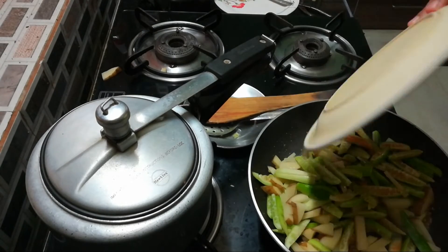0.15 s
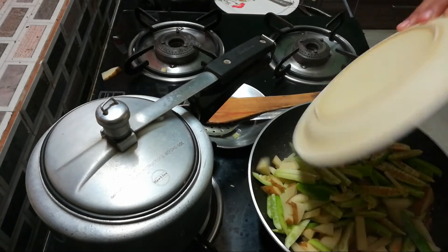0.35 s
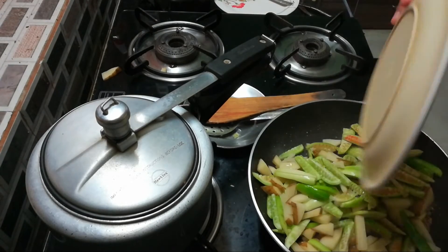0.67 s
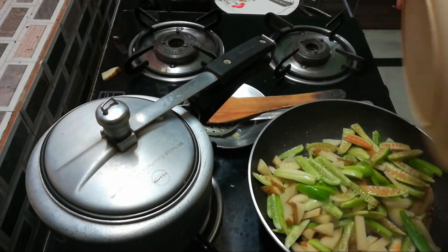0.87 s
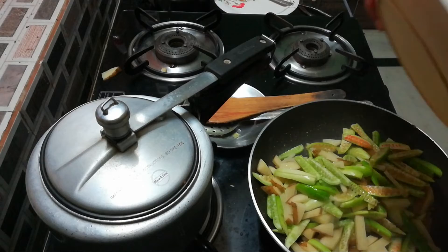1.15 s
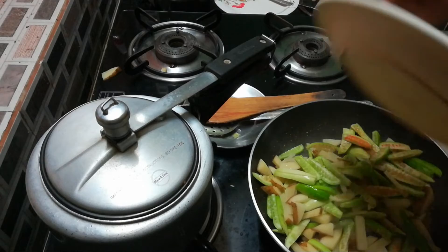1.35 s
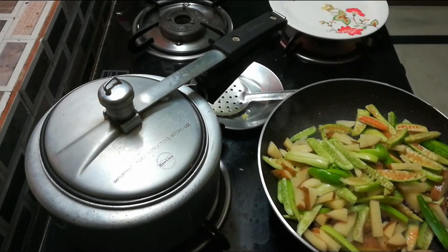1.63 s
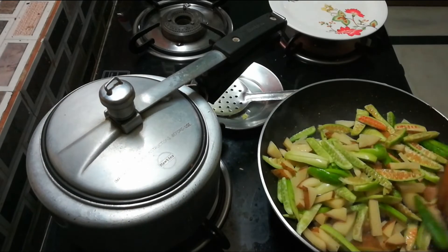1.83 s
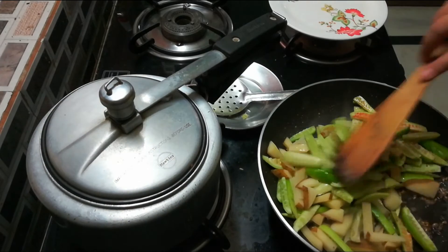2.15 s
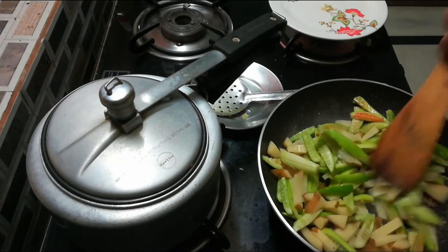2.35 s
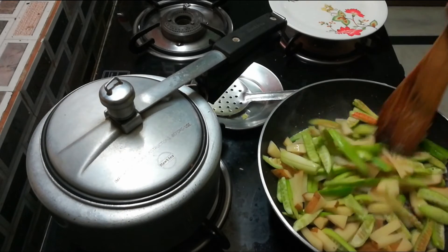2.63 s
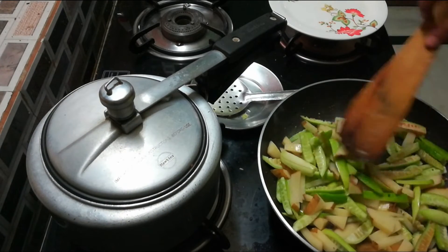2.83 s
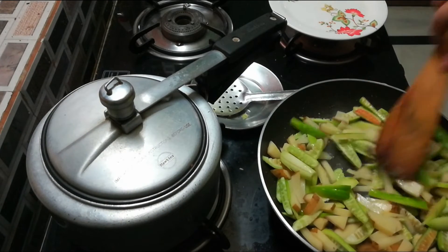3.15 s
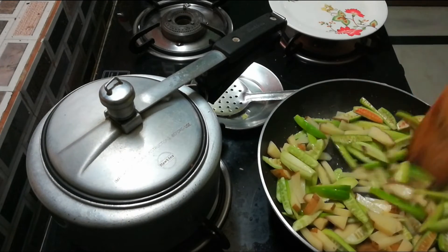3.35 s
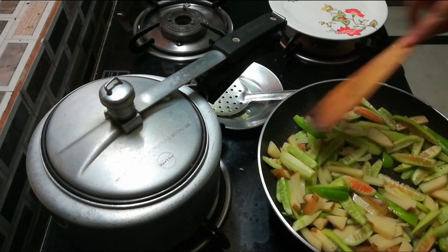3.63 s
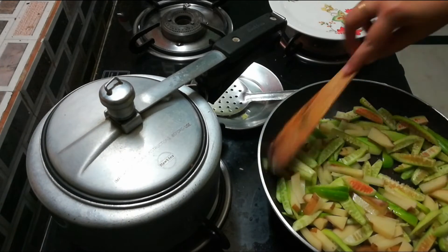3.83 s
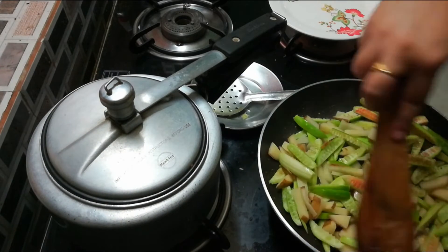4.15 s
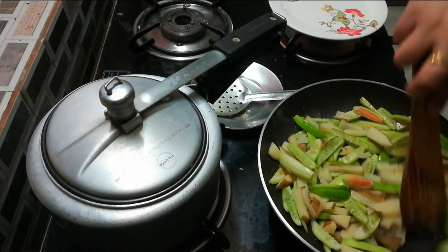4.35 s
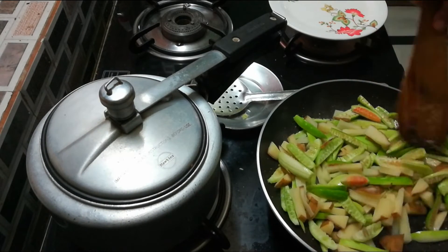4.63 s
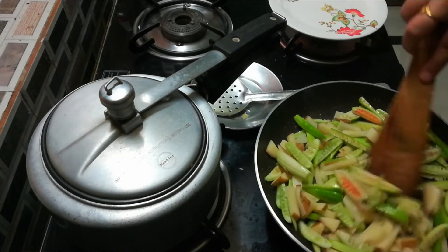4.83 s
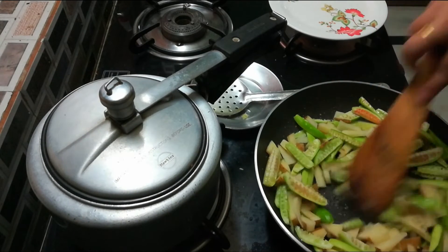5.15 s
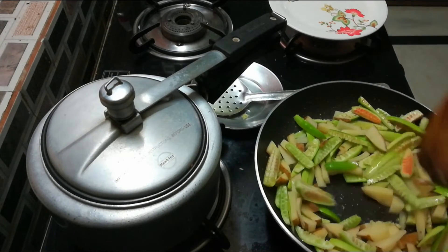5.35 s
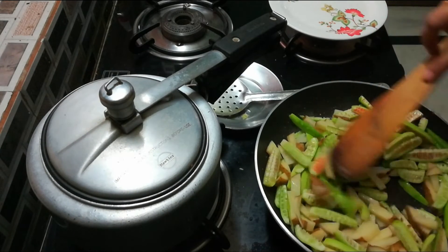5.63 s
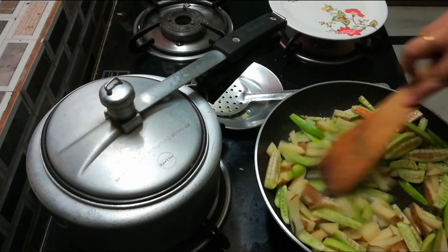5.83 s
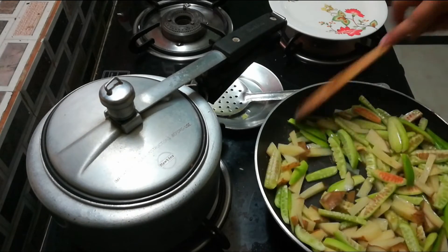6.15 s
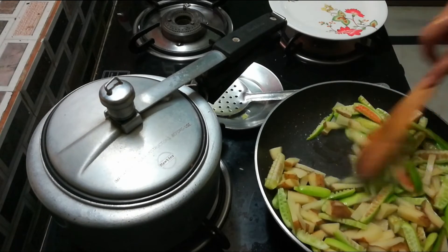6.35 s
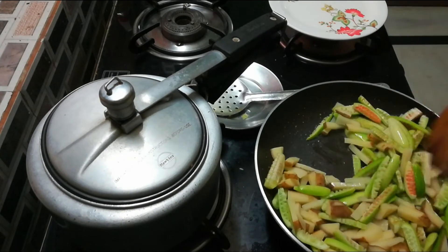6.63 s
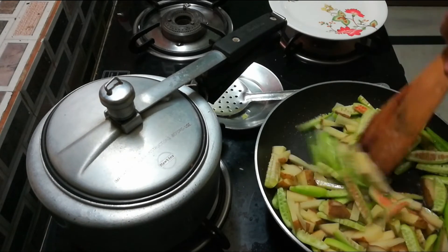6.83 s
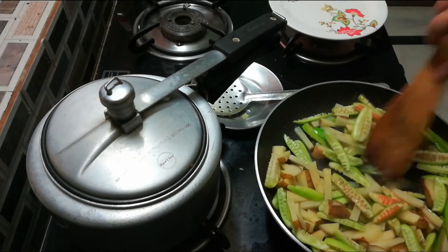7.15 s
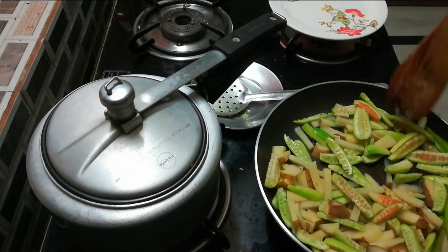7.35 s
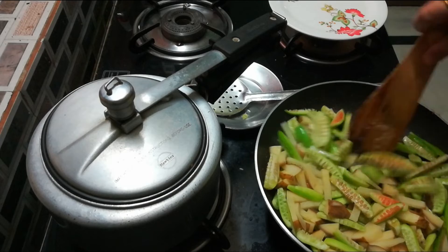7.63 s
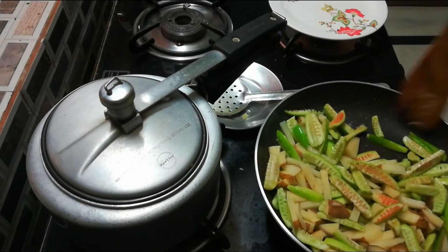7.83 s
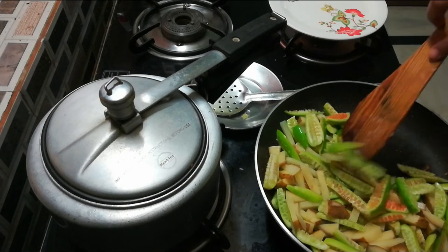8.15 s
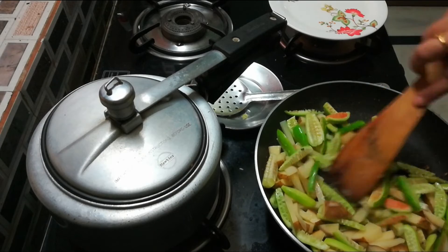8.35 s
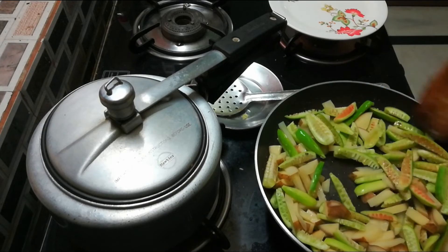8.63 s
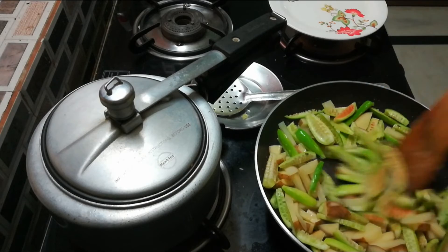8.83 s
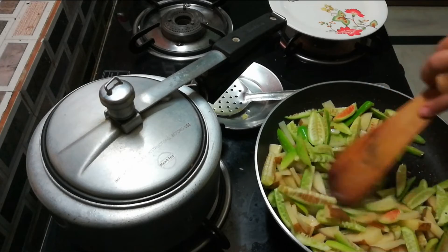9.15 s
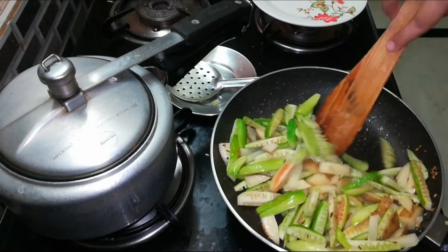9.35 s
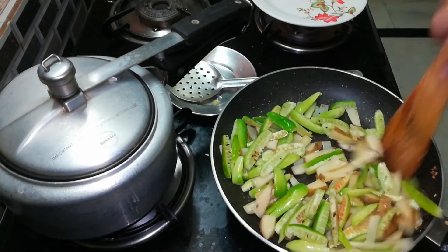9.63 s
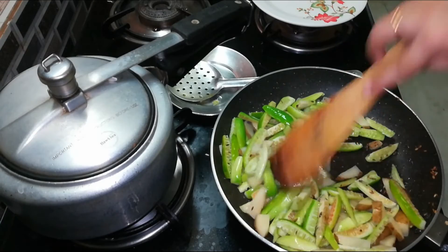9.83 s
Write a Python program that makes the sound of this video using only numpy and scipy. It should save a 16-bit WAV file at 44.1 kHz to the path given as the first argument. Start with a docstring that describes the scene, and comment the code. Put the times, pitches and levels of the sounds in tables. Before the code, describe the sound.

A harsh, high fizz of steam and oil fills the right side, duller and quieter on the left. A plate thuds and booms on the stove early on; stirring follows in rhythmic sticky swishes, each making the sizzle surge. Hollow wood-on-pan knocks and soft wet slaps punctuate it. Near the end comes a scrape and bump, and the frying drops a little. Close microphone, small hard-walled kitchen.

```python
"""Chopped vegetables sizzle in a frying pan on a gas stove, close to the microphone and to the right, in a small
kitchen. Thousands of tiny decaying sine bursts make the steam bubbles; short, loud ones make the spitting drops.
Wet pieces rub and flop; a plate set down on a burner and a wooden spatula scrape and knock, as friction noise
and ringing modes. Filtered noise makes the low flame and stove hum, wavering sines a faint drone, single
pulses some dull thumps. A peak limiter pulls the whole mix down at loud spits and lets it creep back."""
import sys
import numpy as np
from scipy import signal
from scipy.fft import rfft, irfft
from scipy.io import wavfile
from scipy.ndimage import uniform_filter1d, minimum_filter1d

SR = 44100
rng = np.random.default_rng(int(sys.argv[2]) if len(sys.argv) > 2 else 0)


def bounce(signal):
    """Save signal as a 16-bit WAV file at the path given by the first command-line argument."""
    frames = np.transpose(np.atleast_2d(signal))
    limited = np.clip(frames, -1, 1)
    pcm = np.round(limited * 32767).astype(np.int16)
    wavfile.write(sys.argv[1], SR, pcm)


N = 440118
TIME = np.arange(N) / SR


def gain_of(db):
    """Decibels to a factor."""
    return 10 ** (np.asarray(db) / 20)


def evened(x):
    """Scales to rms 1; a stereo pair by its right channel."""
    return x / np.sqrt(np.mean(np.atleast_2d(x)[-1] ** 2) + 1e-20)


def read(points, hz):
    """Reads a frequency table on a log-frequency axis."""
    table_hz, value = np.transpose(points)
    return np.interp(np.log(hz + 1), np.log(table_hz), value)


def curves(rows):
    """The columns of a time table, sample by sample."""
    s, *columns = np.transpose(rows)
    return [np.interp(TIME, s, column) for column in columns]


def add(mix, s, sound):
    """Mixes a sound in at s seconds."""
    part = mix[..., max(round(s * SR), 0):][..., :sound.shape[-1]]
    part += sound[..., :part.shape[-1]]


def colour(x, spectrum, size=4096):
    """Minimum-phase filter with the given gains, so that clicks keep their sharp front."""
    log_gain = np.log(gain_of(read(spectrum, abs(np.fft.fftfreq(size, 1 / SR)))))
    response = np.exp(np.conj(signal.hilbert(log_gain)))
    taps = np.fft.ifft(response).real[:size // 2]
    return signal.oaconvolve(np.atleast_2d(x), taps[None], axes=1)[:, :N]


def ring(modes, tilt_db=0, free=1, uneven_db=3.0, size=30000):
    """Dying modes after one blow, peak 1; each blow lands on another spot and weights them anew."""
    t, out = np.arange(size) / SR, 0
    spots = rng.standard_normal((len(modes), 2))
    for (hz, db, t60), (spot, side) in zip(modes, spots):
        decay = np.exp(-np.log(1000) * t / (t60 * max(free, .05)))
        strength = gain_of(db + tilt_db * np.log2(hz) + uneven_db * spot) * np.sign(side)
        out = out + strength * decay * np.sin(2 * np.pi * hz * t)
    return out / abs(out).max()


# how long the small tiled kitchen rings: pitch_hz [Hz], t60_s [s]
KITCHEN_DECAY = [(150, 0.79), (1000, 0.36), (5000, 0.31), (15000, 0.078)]


def kitchen(x, wet_db, count=4):
    """Adds the tiled room: sparse reflections dying by band, the sound turning among several sets of them."""
    shape = (count, 2, SR // 3)
    signs = rng.choice([-1., 1.], shape)
    taps = signs * (rng.random(shape) < .06) * (TIME[:SR // 3] > .002)  # none in the first 2 ms
    hz, t, bands = signal.stft(taps, SR, nperseg=256)
    decay = gain_of(-60 * t / read(KITCHEN_DECAY, hz)[:, None])
    tails = signal.istft(bands * decay, SR, nperseg=256)[1]
    out = x
    for k, tail in enumerate(tails):
        share = np.cos(np.pi * (9 * TIME + k / count)) * np.sqrt(2 / count)  # the squares sum to 1
        tail = tail / np.linalg.norm(tail[0])
        out = out + gain_of(wet_db) * signal.oaconvolve(np.atleast_2d(x * share), tail, axes=1)[:, :N]
    return out


def bubbles(low_hz, high_hz, cycles, spread_db, clump_db, clump_s, lag_s, count, size):
    """Tiny bursts, each a few cycles at its own pitch and place; they swell in clumps, most small, a few large."""
    when, pitch, life, place, strength = rng.random((count, 5)).T[:, :, None]
    hz, t = low_hz + (high_hz - low_hz) * pitch, np.arange(size) / SR
    at = (when * (N - 1)).astype(int)
    keep = np.exp(-1 / (clump_s * SR))
    clumps = evened(signal.lfilter([1], [1, -keep], rng.standard_normal(N)))
    loud_db = spread_db * np.minimum(-np.log(1 - strength), 5) + clump_db * clumps[at]
    decay = np.exp(-t * hz / (cycles * (.5 + life)))
    grains = gain_of(loud_db) * np.sqrt(hz) * np.sin(2 * np.pi * hz * t) * decay
    lag = (lag_s * SR * (.25 + 1.5 * place)).astype(int)  # the left side hears it later
    return np.array([np.bincount((at + d + np.arange(size)).ravel(), grains.ravel(), N)[:N] for d in (lag, 0)])


# the food is tipped in, jolted or pushed by the spatula; it rubs, and its wet sides flare on the hot metal:
# start_s [s], length_s [s], rub_change_db [dB], fizz_change_db [dB]
FOOD_PUSHES = [(0.016, 0.12, 5, 4.5), (0.283, 0.21, 1.5, 1.5), (.67, 0.34, 1, 0), (1.451, .02, 6.5, 6),
               (1.51, .03, 4.5, 2), (1.72, 0.31, -1.5, 0.5), (2.15, 0.3, 3.5, 2.5), (2.462, 0.51, 4, 2),
               (3.163, 0.41, 4, 2), (3.725, .16, 3.5, 2), (3.95, .11, 4, 4.5), (4.087, 0.44, 3, 2),
               (4.562, .19, 4.5, 3), (4.897, 0.19, 1, 4), (5.232, 0.047, 0.5, 1.5), (5.4, 0.4, 0.5, 2),
               (5.88, 0.24, 1.5, 2.5), (6.405, 0.1, 1.5, 0), (6.57, 0.45, 1.5, 1), (7.223, 0.44, 2.5, 2.5),
               (7.742, 0.27, 3.5, 3), (8.07, .13, 2, 3), (8.34, .27, 1.5, 1.5), (8.662, .22, 4, 2),
               (9.08, .13, 1, -0.5), (9.326, 0.036, 7, 3.5)]
PUSH_RISE, PUSH_RELEASE_S = 0.5, 0.072  # builds over this share of its length, holds, then dies away


def pushing():
    """How far the pushes shift the rubbing and the fizz at each moment, in dB."""
    rub_db, flare_db = np.zeros(N), np.zeros(N)
    for start, length, rub, flare in FOOD_PUSHES:
        corners = [0, PUSH_RISE * length, length, length + PUSH_RELEASE_S]
        shape = np.interp(TIME - start, corners, [0, 1, 1, 0])
        rub_db, flare_db = rub_db + rub * shape, flare_db + flare * shape
    return rub_db, flare_db


FLUTTER_DB, FLUTTER_HZ = .5, 22.02  # small random surges of the boiling: rms depth and fastest rate


def flutter(count=30):
    """Random wavering of rms 1, from sines over the two octaves below FLUTTER_HZ."""
    t = TIME[::64]
    rates = FLUTTER_HZ / 2 ** (2 * rng.random(count))
    waves = sum(np.sin(2 * np.pi * (hz * t + rng.random())) for hz in rates)
    return evened(np.interp(TIME, t, waves))


# the frying between pushes; it slowly cools as the food is turned:
# start_s [s], fizz_db [dB], sputter_db [dB], settling_pieces_db [dB]
SIMMER_LEVELS = [(0, -14.5, -26.5, -40), (1.3, -10.5, -21.5, -35), (1.7, -16, -23, -36.5),
                 (2.4, -13, -22, -34), (3.7, -15.5, -25, -38), (4.6, -15.5, -22.5, -36),
                 (7.7, -15, -23.5, -36), (8.3, -17, -25, -37), (9.25, -14.5, -23.5, -32.5),
                 (9.5, -20, -28, -38), (9.98, -20.5, -28, -37)]
SPUTTER_PER_RUB, SPUTTER_PER_FLARE = 0.72, 0.24  # juice pressed out by a push: dB of sputter per dB of each


def frying_levels():
    """Levels of fizz, sputter and rubbing in dB: the simmer, shifted by each push, with random surges."""
    fizz_db, sputter_db, settling_db = curves(SIMMER_LEVELS)
    rub_db, flare_db = pushing()
    surge_db = FLUTTER_DB * flutter()
    juice_db = SPUTTER_PER_RUB * rub_db + SPUTTER_PER_FLARE * flare_db + FLUTTER_DB * flutter()
    return fizz_db + flare_db + surge_db, sputter_db + juice_db + surge_db, settling_db + rub_db + surge_db


# colour given to the fine bubbles: pitch_hz [Hz], gain_db [dB]
FIZZ_COLOUR = [(2500, -49), (4800, -14), (5600, -12.5), (6300, -8.5), (7200, -4), (7800, -1), (8500, -4.5),
               (9500, -11), (10200, -17.5), (11000, -23), (13000, -25), (15500, -40.5)]
# smooth steam hiss under the bubbles: pitch_hz [Hz], relative_density_db [dB per Hz]
STEAM_COLOUR = [(3000, -27.5), (5500, -12.5), (7000, 1), (7800, 2), (8600, -3), (9500, -8.5),
                (11000, -18.5), (13000, -18), (15500, -21.5)]


def fizz():
    """Fine bubbles burst at high pitches over a smooth noise of steam."""
    fine = bubbles(4430, 12630, cycles=1.8, spread_db=2.5, clump_db=1.07, clump_s=0.0021,
                   lag_s=.00018, count=70000, size=56)
    fine = evened(kitchen(colour(fine, FIZZ_COLOUR), wet_db=-5.5))
    steam = evened(colour(rng.standard_normal((2, N)), STEAM_COLOUR))
    return evened(fine + gain_of(-6.5) * steam)


# colour given to the larger, wetter bubbles: pitch_hz [Hz], gain_db [dB]
SPUTTER_COLOUR = [(600, -38), (1500, -15.5), (2300, -9), (3000, -3), (3600, -2.5), (4400, -1), (5300, -2),
                  (6200, -2), (8000, -34), (15000, -63)]


def sputter():
    """Larger bubbles burst in the juice, lower and longer than the fizz."""
    large = bubbles(1254, 7470, cycles=1.5, spread_db=2.5, clump_db=0.4, clump_s=0.0039,
                    lag_s=.00017, count=40000, size=112)
    return evened(kitchen(colour(large, SPUTTER_COLOUR), wet_db=-2.0))


# drops of water spitting in the oil: start_s [s], peak_db [dB, before the room and the sides], pitch_hz [Hz]
WATER_SPITS = [(1.077, 8, 7520), (1.435, 1.5, 7840), (1.547, 3.5, 7700), (1.647, 4.5, 7040),
               (1.764, 6, 8000), (1.827, 4, 7700), (1.968, 1.5, 7200), (2.019, 3, 7620), (2.485, 2.8, 7800),
               (2.681, 6, 7580), (3.111, 3, 7500), (4.271, 6, 7800), (4.669, 4.5, 5800), (4.795, 4, 6060),
               (5.022, 2, 9100), (5.054, 1.5, 8100), (5.149, 6, 7800), (5.494, 3, 7800), (6.519, 5, 8100),
               (7.593, 2.5, 8100), (7.628, 4, 7550), (7.753, 4.5, 7820), (8.16, 3.5, 7950),
               (8.171, 5.5, 6870), (8.897, 7.5, 7500), (9.216, 3.5, 6670), (9.302, 6, 7430)]
POP_DB, POP_SPREAD_DB, POP_HZ = 11, 1.5, 7340  # lesser drops: peak above the fizz level, scatter, middle pitch


def spits(fizz_db, ring_s=0.00031, size=128, count=110):
    """A drop flashes to steam: one short, loud burst. Lesser drops pop at random."""
    out, u = np.zeros((2, N)), TIME[:size] / ring_s * 2
    pops = []
    for when, force, pitch in rng.random((count, 3)):
        pop_db = fizz_db[int(when * N)] + POP_DB + POP_SPREAD_DB * (2 * force - 1)
        pops.append((when * N / SR, pop_db, POP_HZ * 2 ** (pitch - .5)))
    for s, db, hz in WATER_SPITS + pops:
        wave = np.sin(2 * np.pi * hz * TIME[:size] + rng.uniform(0, 2 * np.pi))
        burst = gain_of(db) * u * np.exp(1 - u) * wave
        add(out[1], s, burst)
        add(out[0], s + 6 / SR, burst)  # the left side hears it 6 samples later
    return kitchen(out, wet_db=-13)


# gain of the hiss at the far, left side of the microphone: start_s [s], left_gain_db [dB, besides its colour]
LEFT_LEVEL = [(0, -10), (.7, -15.5), (1.2, -12), (2.0, -15), (5.1, -15), (8.2, -14), (8.3, -9), (9.98, -8)]
# colour of the hiss on that side: pitch_hz [Hz], gain_db [dB]
LEFT_COLOUR = [(1500, 9.5), (2300, 11), (3000, 4.5), (4200, 7), (5400, 6.5), (7000, 2), (7800, -0.5),
               (8600, 0.5), (9500, 0), (11000, 8), (13000, 1.5), (15500, 9)]


def sizzle(fizz_db, sputter_db):
    """Fizz, sputter and spits from the right; the left side is shaded from the pan."""
    hiss = gain_of(fizz_db) * fizz() + gain_of(sputter_db) * sputter()
    left, right = hiss + spits(fizz_db) * gain_of([[-3], [0]])
    return np.array([colour(left, LEFT_COLOUR)[0] * gain_of(curves(LEFT_LEVEL)[0]), right])


# colour given to the rubbing: pitch_hz [Hz], gain_db [dB]
RUBBING_COLOUR = [(120, -30), (300, -16), (500, -19.5), (700, -11), (900, -4.5), (1100, -1.5), (1350, -0.5),
                  (1800, 1), (2300, -1.5), (3000, -14), (6000, -43)]
# modes of the loaded pan, rung here and by the knocks: pitch_hz [Hz], level_db [dB], t60_s [s, undamped]
LOADED_PAN = [(317.7, -4.5, 0.31), (265, -18, 0.11), (359, -10.5, 0.3), (410, -17, 0.16), (585, -17, 0.056),
              (775, -0.5, 0.041), (893, 1, 0.06), (1052, -4, 0.13), (1165, -8, 0.11), (1333, -2, 0.21),
              (1419, 7, 0.056), (1710, -1, 0.11), (1883, -8, 0.23), (2140, 2, 0.055)]


def stirring(rub_db):
    """Sticky slips of wet pieces: some heard directly, a little louder on the right, others through the ringing
    pan, alike on both sides."""
    slips, on_metal = [bubbles(280, 2970, cycles=0.86, spread_db=3.0, clump_db=1.4, clump_s=0.0053,
                               lag_s=.00006, count=16000, size=256) for _ in range(2)]
    body = evened(signal.oaconvolve(on_metal[1], ring(LOADED_PAN, uneven_db=0.4))[:N])
    direct = evened(kitchen(slips, wet_db=-1)) * gain_of([[-4], [0]])
    rub = colour(direct + gain_of(-11) * body, RUBBING_COLOUR)
    return gain_of(rub_db) * evened(rub)


# colour of the gas flame: pitch_hz [Hz], relative_density_db [dB per Hz]
FLAME_COLOUR = [(15, 3), (40, -1), (65, -1), (100, 0.5), (150, 1), (200, 1.5), (240, -7.5), (320, -16),
                (500, -17), (1500, -36)]
FLAME_DB, FLAME_FOLLOWS = -60, 0.28  # mean level, and the share of the hum's swells that it follows


def flame_rumble(hum_db):
    """The gas flame: low noise, mostly shared by both sides with a little of its own on each."""
    noise = rng.standard_normal(N) + 0.27 * rng.standard_normal((2, N))
    level_db = FLAME_DB + FLAME_FOLLOWS * (hum_db - hum_db.mean())
    return gain_of(level_db) * evened(colour(noise, FLAME_COLOUR, size=16384))


# the stove top humming over the flame: pitch_hz [Hz], width_hz [Hz], level_db [dB]
HUM_RESONANCES = [(125.6, 12.7, -3), (152.9, 11, -0.5), (179, 7.2, -1)]
# how that hum swells: start_s [s], level_db [dB]
HUM_SWELLS = [(0, -55), (1.35, -50), (1.55, -45.5), (2.0, -52), (2.45, -48), (3.5, -54.5), (4.0, -59.5),
              (5.6, -62), (7.7, -60.5), (8.5, -56), (9.98, -55.5)]


def stove_hum(hum_db):
    """Noise through narrow resonances of the stove top, alike on both sides."""
    f = np.fft.rfftfreq(N, 1 / SR)
    resonances = sum(gain_of(db) / (1 + 2j * (f - hz) / width) ** 2 for hz, width, db in HUM_RESONANCES)
    return gain_of(hum_db) * evened(irfft(rfft(rng.standard_normal(N)) * resonances, N))


# a faint low drone that comes and goes: start_s [s], end_s [s], pitch_hz [Hz], level_db [dB]
DRONE_SPANS = [(0, 0.347, 76.7, -57.5), (.88, 1.12, 76.5, -55), (1.216, 1.442, 76.5, -54),
               (8.07, 9.36, 67.5, -56.5), (9.24, 9.86, 97, -51.5), (9.33, 10.1, 38, -51),
               (9.394, 10.1, 57, -66), (9.45, 9.8, 159, -55.5), (9.72, 10.1, 199, -57.5),
               (9.78, 10.102, 120, -57)]


def drone():
    """Faint low sines that fade in and out, their phase wavering slowly."""
    out = np.zeros(N)
    for start, end, hz, db in DRONE_SPANS:
        t = np.arange(0, end - start, 1 / SR)
        waver = .5 * np.sin(2 * np.pi * (2.4 * t + rng.random()))
        tone = np.sin(2 * np.pi * hz * t + waver) * signal.windows.tukey(len(t), .3)
        add(out, start, gain_of(db) * evened(tone))
    return out


# wet pieces tumbling over: start_s [s], peak_db [dB, before the room and the sides], pitch_hz [Hz]
WET_SLAPS = [(1.46, -17, 1550), (2.881, -18, 1420), (3.41, -19, 1380), (4.73, -16, 1420),
             (5.056, -21, 1420), (5.55, -23, 1810), (9.343, -15, 2330), (9.414, -18.5, 1180)]


def slaps(ring_s=0.0037, size=1500):
    """Pieces flop onto the oily metal with a short wet smack: eight dying sines around one pitch."""
    out, t = np.zeros(N), TIME[:size]
    for s, db, hz in WET_SLAPS:
        pitches = hz * rng.uniform(.65, 1.45, 8)
        tones = sum(np.sin(2 * np.pi * (f * t + rng.random())) for f in pitches)
        smack = tones * np.exp(-t / ring_s)
        add(out, s, gain_of(db) * smack / abs(smack).max())
    return kitchen(out, wet_db=-7) * gain_of([[-3], [.5]])


# soft, dull low thumps, as from handling the microphone or setting down a plate:
# start_s [s], level_db [dB], length_s [s]
LOW_THUMPS = [(1.460, -26, .002), (4.271, -27, .0022), (9.343, -31, .0012), (9.358, -35, .002)]


def thumps():
    """Soft, dull low thumps: one quick swing and a slower one back, dry and alike on both sides."""
    out = np.zeros(N)
    for s, db, length in LOW_THUMPS:
        u = TIME[:SR // 20] / length
        add(out, s, gain_of(db) * (1 - u) * np.exp(-u) * np.tanh(4 * u) * 2)
    return out


# short hard scrapes of plate and spatula:
# start_s [s], level_db [dB, before the fade, room and sides], length_s [s], low_hz [Hz], high_hz [Hz]
HARD_SCRAPES = [(1.46, -27.5, .025, 250, 6000), (2.777, -38.5, .065, 310, 440),
                (3.868, -42.5, .04, 280, 800), (7.699, -39, .04, 260, 1100), (9.34, -26, 0.03, 250, 5000),
                (9.392, -33.5, 0.049, 335, 425), (9.409, -32, 0.038, 600, 1400)]


def scrapes():
    """A hard edge skids: a burst of friction noise that starts at once and dies quickly."""
    out, t = np.zeros((2, N)), TIME[:SR // 4]
    for s, db, length, low_hz, high_hz in HARD_SCRAPES:
        friction = rng.standard_normal(len(t)) + 1.05 * rng.standard_normal((2, len(t)))
        band_filter = signal.butter(2, [low_hz, high_hz], "band", fs=SR, output="sos")
        band = signal.sosfilt(band_filter, friction)
        add(out, s, gain_of(db) * evened(band) * np.exp(-(t / length) ** 2))
    return kitchen(out, wet_db=-9.5) * gain_of([[-3], [0]])


# plate set down on the burner, stove shaken by the pan: start_s [s], peak_db [dB, before a 1.5 dB lift]
BURNER_BUMPS = [(1.461, -25.5), (1.584, -36), (1.701, -37.5), (2.331, -38)]
# modes of the steel stove top: pitch_hz [Hz], level_db [dB], t60_s [s]
STOVE_TOP = [(134, -13, .5), (148.1, 4.5, 0.81), (170, -8, 0.52), (256, -13, .1), (420, -22, .07),
             (810, -10, .1), (980, -9, .1), (1380, -1, .15)]


def stove_booms():
    """The plate and the pan set the stove top booming; close to the microphone, so nearly dry."""
    stove = np.zeros(N)
    for s, db in BURNER_BUMPS:
        add(stove, s, gain_of(db) * ring(STOVE_TOP, uneven_db=3))
    return kitchen(gain_of(1.5) * stove, wet_db=-18)


# spatula against the pan: start_s [s], peak_db [dB, dry left side], hardness_db [treble tilt, dB per octave],
# free [share of the ring time that the blade leaves undamped]
SPATULA_KNOCKS = [(1.959, -45, 0, .5), (2.78, -34, -1, 0.62), (2.81, -36, 0, 0.45), (3.066, -45, 2, .5),
                  (3.863, -28.5, -2, 0.97), (3.971, -45, 0, .6), (4.595, -43, -3, .7),
                  (6.253, -25, -4, 0.95), (7.700, -24, 0.5, 0.62), (7.981, -38, -7.5, 0.6),
                  (8.108, -28, 0, 0.97), (8.771, -33, 0, .5), (9.344, -35, -2, 0.61),
                  (9.416, -29.5, -3.5, .7)]


def knocks():
    """The spatula strikes the pan and rings its modes; close to the microphone, so nearly dry."""
    pan = np.zeros(N)
    for s, db, hardness_db, free in SPATULA_KNOCKS:
        add(pan, s, gain_of(db) * ring(LOADED_PAN, hardness_db, free, uneven_db=0.5))
    return kitchen(pan * gain_of([[0], [3]]), wet_db=-18)


def scene():
    """The frying, the stove and everything that touches them."""
    fizz_db, sputter_db, rub_db = frying_levels()
    hum_db = curves(HUM_SWELLS)[0]
    food = sizzle(fizz_db, sputter_db) + stirring(rub_db) + slaps()
    low = flame_rumble(hum_db) + stove_hum(hum_db) + drone() + thumps()
    return food + low + scrapes() + stove_booms() + knocks()


EDGE_HZ = 15750  # top of the recorder's band


def record(dry, ceiling_db=-0.3, recovery_db_per_s=45):
    """A peak limiter drops the gain at once and lets it creep back; then the band limit."""
    peak_db = 20 * np.log10(abs(dry).max(0) + 1e-9)
    fall_db = TIME * recovery_db_per_s
    held_db = np.maximum.accumulate(peak_db + fall_db) - fall_db
    over_db = np.maximum(held_db - ceiling_db, 0)
    gain_db = uniform_filter1d(minimum_filter1d(-over_db, size=41), size=41)
    edge = signal.firwin(511, EDGE_HZ, window=("kaiser", 9), fs=SR)
    return signal.oaconvolve(dry * gain_of(gain_db), edge[None], "same")


dry = scene()
out = record(dry)
bounce(out)
```